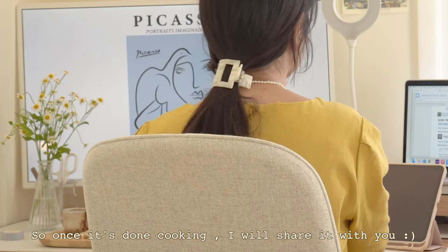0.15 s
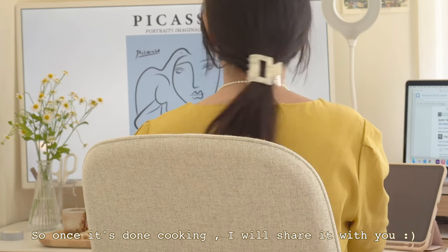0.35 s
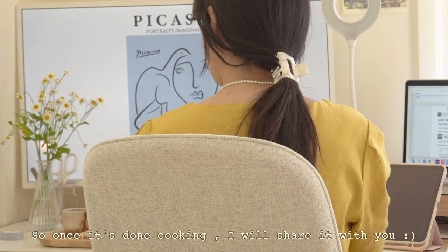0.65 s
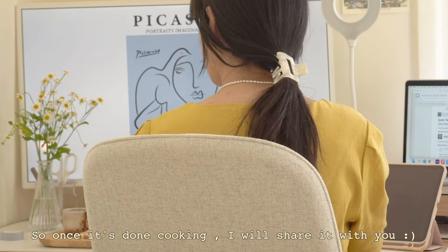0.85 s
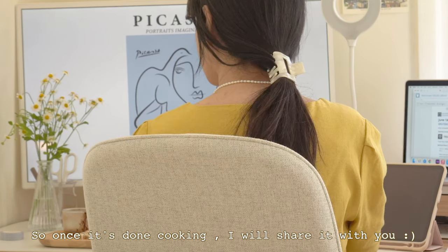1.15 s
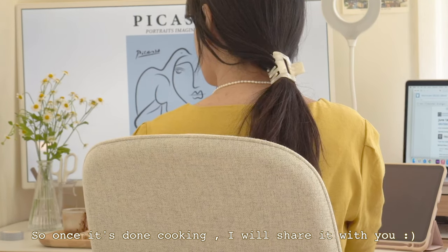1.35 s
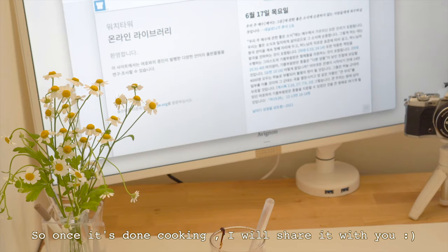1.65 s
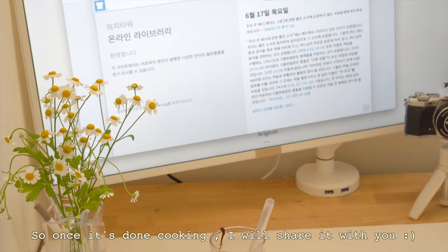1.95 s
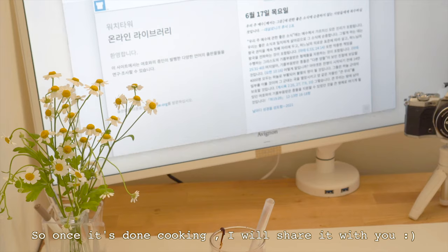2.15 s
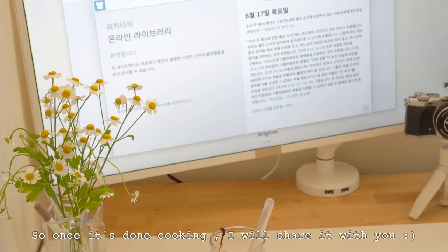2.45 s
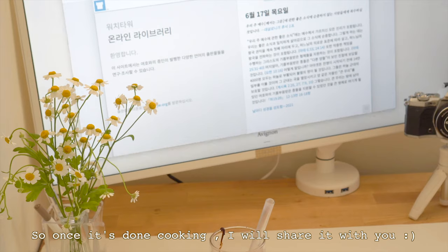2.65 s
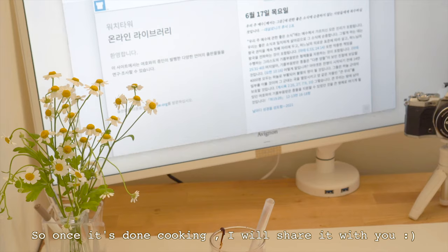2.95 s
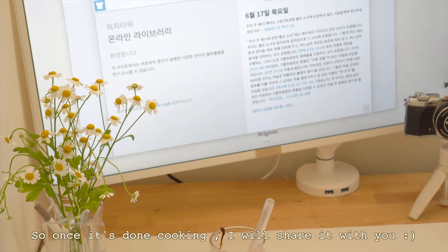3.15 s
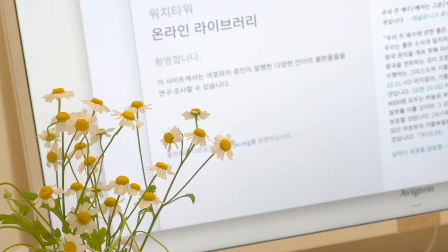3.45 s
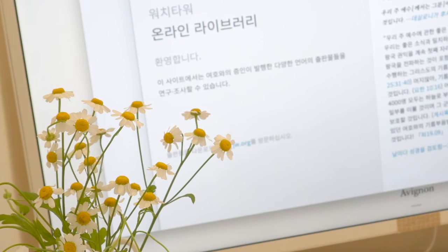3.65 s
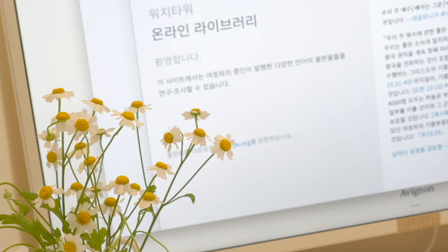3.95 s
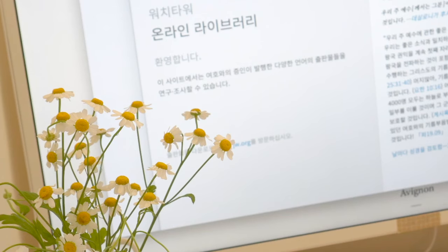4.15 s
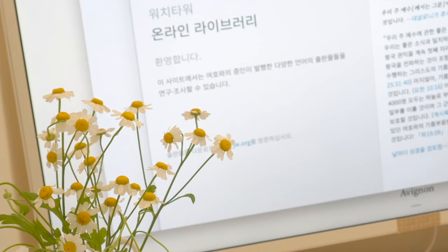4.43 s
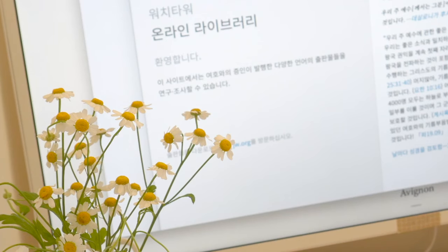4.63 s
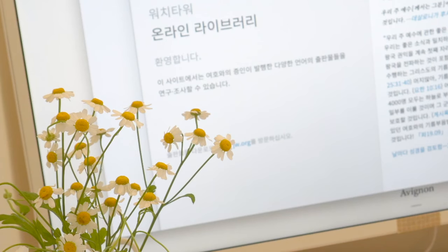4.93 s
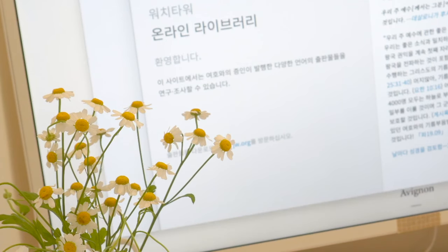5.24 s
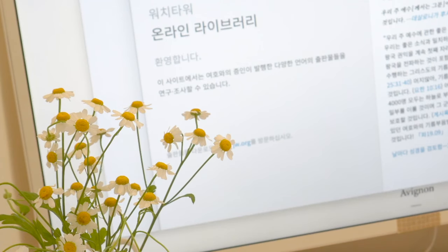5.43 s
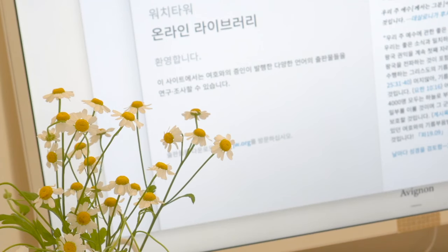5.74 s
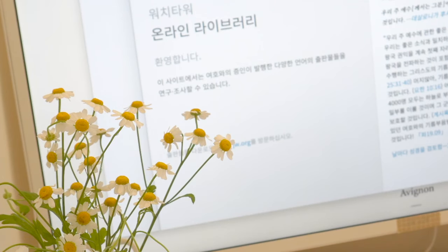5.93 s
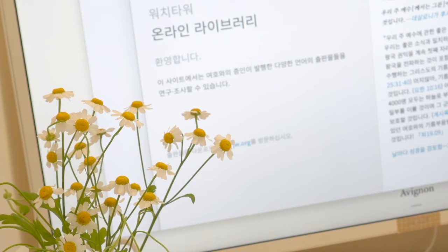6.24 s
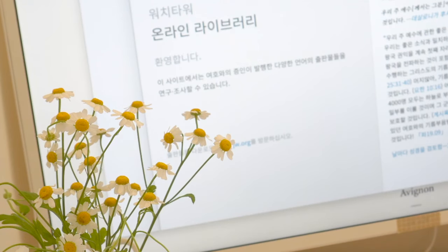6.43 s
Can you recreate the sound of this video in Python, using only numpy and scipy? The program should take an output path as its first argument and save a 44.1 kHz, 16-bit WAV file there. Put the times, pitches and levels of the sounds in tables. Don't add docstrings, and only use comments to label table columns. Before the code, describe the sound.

In a small quiet room, a glass straw swirls through an iced drink, clinking high and bright on the glass while ice chinks and liquid hums softly. The sound cuts abruptly to a quieter desk: crisp mouse clicks, each down and up, a hand tap, a dull thump that rings the desk top, and small late ticks. Stereo microphone a little way off, with faint hum.

```python
import sys
import numpy as np
from scipy import signal
from scipy.fft import rfft
from scipy.io import wavfile
from scipy.ndimage import uniform_filter1d

SR = 44100
rng = np.random.default_rng(int(sys.argv[2]) if len(sys.argv) > 2 else 0)


def volts_from_db(level):
    exponent = np.asarray(level, float) / 20
    return 10 ** exponent


def unload_audio(sound):
    columns = np.transpose(np.atleast_2d(sound))
    steps = np.round(np.clip(columns, -1, 1) * 32767)
    wavfile.write(sys.argv[1], SR, steps.astype(np.int16))


N = 290619


def evened(x):
    return x / np.sqrt(np.mean(x ** 2) + 1e-20)


def read(points, hz):
    f, value = np.transpose(points)
    return np.interp(np.log(hz + 1), np.log(f + 1), value)


def bumps(modes, hz):
    return sum(db * np.exp(-(2 * (hz - f) / width) ** 2) for f, width, db in modes)


def causal(db):
    log_gain = np.log(volts_from_db(np.maximum(db, -90)))
    full = np.concatenate([log_gain, log_gain[-2:0:-1]])
    return np.fft.ifft(np.exp(np.conj(signal.hilbert(full)))).real[:len(db) // 2]


def resonate(x, hz, width):
    b, a = signal.iirpeak(hz, hz / width, SR)
    return signal.lfilter(b, a, x)


def swells(events, rise_db_per_s, fall_db_per_s, rest_db):
    t, power = np.arange(N) / SR, volts_from_db(2 * rest_db)
    for s, hold, db in events:
        away_db = rise_db_per_s * np.maximum(s - t, 0) + fall_db_per_s * np.maximum(t - s - hold, 0)
        power = power + volts_from_db(2 * (db - away_db))
    return np.sqrt(power)


def likeness(side_db, hz):
    side = volts_from_db(2 * read(side_db, hz))
    return ((1 - side) / (1 + side))[:, None]


def hum(lines):
    return sum(volts_from_db(db) * evened(resonate(rng.standard_normal(N), f, width)) for f, width, db in lines)


# pitch_hz, side_minus_mid_db
NOISE_SIDE = [(60, -40), (130, -13), (290, -9), (640, -4), (1410, -0.5), (3100, -1), (6820, -1),
              (15000, -2.5)]


def hiss(colour, patchy_db):
    frames, hz = N // 512 + 5, np.fft.rfftfreq(2048, 1 / SR)
    a, b, c, d, patches = rng.standard_normal((frames, 1025, 5)).T
    patches = uniform_filter1d(patches, size=20, axis=0)
    patches = evened(uniform_filter1d(patches, size=8, axis=1))
    same, left = likeness(NOISE_SIDE, hz), a + 1j * b
    right = same * left + np.sqrt(1 - same ** 2) * (c + 1j * d)
    z = np.array([left, right]) * volts_from_db(read(colour, hz)[:, None] + patchy_db * patches)
    return evened(signal.istft(z, nperseg=2048, noverlap=1536)[1][:, :N])


# pitch_hz, time_to_fall_60_db_s
WALL_DECAY = [(200, 0.35), (600, 0.65), (1500, 0.54), (4000, 0.49), (6000, 0.44), (10000, 0.31),
              (15000, 0.47)]
# pitch_hz, side_minus_mid_db
ECHO_SIDE = [(60, -20.5), (130, -25.5), (290, -12), (640, -14), (1410, -9.5), (3100, -4.5), (6820, -0.5),
             (15000, -4)]


def room():
    taps = np.zeros((2, 30000))
    at = np.arange(120, 29980, 20) + rng.integers(0, 20, (2, 1493))
    np.put_along_axis(taps, at, rng.choice([-1., 1.], at.shape), 1)
    hz, t, z = signal.stft(taps, SR, nperseg=256)
    same = likeness(ECHO_SIDE, hz)
    z = np.array([z[0], same * z[0] + np.sqrt(1 - same ** 2) * z[1]])
    fade_db = -60 * t / read(WALL_DECAY, hz)[:, None]
    tail = signal.istft(z * volts_from_db(fade_db), SR, nperseg=256)[1]
    build_s = 0.014
    tail = tail * np.tanh(np.arange(tail.shape[1]) / SR / build_s)
    return tail / np.linalg.norm(tail[0])


# delay_ms, level_db
NEAR_ECHOES = [(4.1, 0.5), (9.3, -21), (13.5, -10), (20.5, -9.5), (31.0, -10)]


def struck_paths(contact_ms, wet_db, rebound_ms, rebound_db):
    paths = volts_from_db(wet_db) * room()
    paths[:, 0] = 1
    for (ms, echo_db), apart in zip(NEAR_ECHOES, rng.integers(0, 12, (len(NEAR_ECHOES), 2))):
        paths[[0, 1], round(ms * SR / 1000) + apart] += volts_from_db(echo_db)
    t = np.arange(800) / SR
    chatter = rng.standard_normal(len(t)) * np.exp(-(t * 1000 / contact_ms) ** 3) * np.tanh(t / 0.001)
    rebound = np.roll(chatter[::-1], round((contact_ms + rebound_ms) * SR / 1000))
    chatter = chatter + volts_from_db(rebound_db) * rebound
    return signal.fftconvolve(paths, chatter[None], axes=1)


STRAW_REST_HZ, SPOT_HOLD_S = 5650, 0.15


def blows(events, colour, pivot_hz, contact_ms, wet_db, gaps=(), lead_ms=0, lead_db=-90,
          pitch=((0, STRAW_REST_HZ),), spots=(), size=19, rebound_ms=0, rebound_db=-90, damp_db_per_s=0):
    hz, out = np.fft.rfftfreq(4096, 1 / SR), np.zeros((2, N + SR))
    lead = round(lead_ms * SR / 1000)
    body_db = read(colour, hz) + bumps(gaps, hz)
    for s, db, tilt_db, pan_db in events:
        paths = struck_paths(contact_ms, wet_db, rebound_ms, rebound_db)
        sunk_hz = STRAW_REST_HZ - np.interp(s, *np.transpose(pitch))
        colour_db = np.interp(hz + sunk_hz, hz, body_db) + tilt_db * np.log2((hz + 50) / pivot_hz)
        here = [mode for at, *mode in spots if 0 <= s - at < SPOT_HOLD_S]
        colour_db = colour_db + bumps(here, hz)
        chance = uniform_filter1d(abs(rfft(paths[:, :4096].mean(0))) ** 2, size=size)
        uneven_db = 10 * np.log10(chance / np.median(chance))
        touch = volts_from_db(lead_db) * causal(np.minimum(colour_db, -14.) - uneven_db)
        ring = np.pad(causal(colour_db - uneven_db), (lead, 0)) + np.pad(touch, (0, lead))
        sound = signal.fftconvolve(ring[None], paths, axes=1)
        sound *= volts_from_db(-damp_db_per_s * np.arange(sound.shape[1]) / SR)
        sound *= volts_from_db(db - 10.0) / np.sqrt(np.mean(sound[:, :2000] ** 2))
        start = max(round(s * SR) - lead, 0)
        out[:, start:start + sound.shape[1]] += sound * volts_from_db([[pan_db / 2], [-pan_db / 2]])
    return out[:, :N]


# full_effort_s, hold_s, level_db
STIR_STROKES = [
    (0.0, 0.0, -28),
    (0.25, 0.28, -40),
    (0.91, 0, -27.5),
    (1.36, 0.032, -38.5),
]
# pitch_hz, width_hz, level_db
DRINK_MODES = [(1148, 50, -10.5), (1464, 63, 11), (2810, 48.2, 5.5), (3034, 140, 16), (3732, 64, -6),
               (3582, 25.8, -16.5), (4275, 49, 5), (4800, 20, -32)]
# pitch_hz, level_db (per Hz)
SCRAPE_COLOUR = [(530, -17.5), (900, -36.5), (1150, -1), (1870, -1.5), (2920, -5), (3830, -4), (5850, 1.5),
                 (7150, -17), (8940, -9), (13200, -38), (15000, -23)]


def stirring():
    slips = volts_from_db(3.5 * np.minimum(rng.exponential(1, N), 4)) * (rng.random(N) < 1500 / SR)
    slips = slips * rng.choice([-1., 1.], N) + 0.31 * rng.standard_normal(N)
    rings = sum(volts_from_db(db) * evened(resonate(slips, f, 2.6 * width)) for f, width, db in DRINK_MODES)
    rasp = signal.oaconvolve(slips, causal(read(SCRAPE_COLOUR, np.fft.rfftfreq(2048, 1 / SR))))[:N]
    effort = swells(STIR_STROKES, rise_db_per_s=345.5, fall_db_per_s=189.5, rest_db=-52.5)
    dry = effort * evened(volts_from_db(6.0) * evened(rings) + evened(rasp))
    return volts_from_db(-7.5) * dry + volts_from_db(-6.0) * signal.fftconvolve(dry[None], room(), axes=1)[:, :N]


# crest_s, hold_s, level_db
LIQUID_WAVES = [(0.0, 0.0, -31.5), (0.224, 0.0, -39.5), (0.336, 0.019, -40.5), (0.464, 0.036, -49),
                (0.734, 0.0, -47.5), (0.9, 0.041, -42.5), (1.298, 0.0, -53), (1.444, 0.0, -38)]


def slosh():
    left, apart = rng.standard_normal((2, N))
    air = np.array([left, left + 0.52 * apart])
    for _ in range(2):
        air = resonate(air, 1165, 110)
    swirl = swells(LIQUID_WAVES, rise_db_per_s=225.5, fall_db_per_s=190.5, rest_db=-60)
    return volts_from_db(-5.0) * swirl * evened(air)


# time_s, level_db
RUMBLE_SWELL = [(0, -2), (.25, -3), (.5, -0.5), (.9, 1.5), (1.2, 1.5), (1.49, -2)]


def rumble_gain():
    s, db = np.transpose(RUMBLE_SWELL)
    return volts_from_db(np.interp(np.arange(N) / SR, s, db))


# pitch_hz, level_db (per Hz)
DRINK_AIR = [(15, -35), (30, -16.5), (76, 1), (206, -9), (354, -9.5), (545, -8.5), (988, -24.5),
             (1160, -18), (4250, -32.5), (4870, -35), (5730, -20), (6560, -37.5), (16000, -40.5)]


def drink_air():
    air = volts_from_db(-45) * hiss(DRINK_AIR, 0.89)
    low = signal.sosfiltfilt(signal.butter(2, 600, fs=SR, output="sos"), air)
    return air + (rumble_gain() - 1) * low


# pitch_hz, width_hz, level_db
MOTOR_LINES = [(59.6, 2.8, -53.5), (75.8, 6.8, -61), (153, 8.7, -62.5), (204, 10, -55)]


def motor():
    return rumble_gain() * hum(MOTOR_LINES)


# start_s, level_db, brightness_db (per octave), left_minus_right_db
STRAW_CLINKS = [(0.0522, -7.5, 3, 2.5), (0.079, -15, -0.5, -6.5), (0.098, -20, 5, 9),
                (0.1115, -17, -0.5, 1), (0.1478, -22.5, -1, -1), (0.3598, -9.5, 1.6, 1.5),
                (0.5685, -11.5, 1.1, 1.5), (0.996, -13, 0.5, 0.5), (1.349, -23.5, -3.5, 1),
                (1.405, -23, -1.5, 1), (1.459, -32, -5.5, -1)]
# pitch_hz, level_db (per Hz)
GLASS_COLOUR = [(1200, -36), (2100, -20.5), (2750, -20.5), (4300, -11.5), (4800, -19), (5350, -9),
                (5620, 7), (5850, -6), (6400, -13.5), (7600, -16.5), (8200, -13.5), (10200, -19.5),
                (13500, -27.5), (16000, -39.5)]
# pitch_hz, width_hz, level_db
GLASS_MODES = [(2800, 86, 7), (4270, 63, 3), (5057, 300, -25), (5590, 18, 1), (5630, 25, 3), (6000, 40, 0),
               (6080, 44, -0.5), (6750, 500, -26), (11040, 950, -16.5), (12550, 400, -13.5),
               (14600, 430, -11)]
# time_s, pitch_hz
STRAW_DEPTH = [(0.0, 5640), (0.2, 5670), (0.36, 5740), (0.57, 5690), (1.0, 5564), (1.35, 5590),
               (1.49, 5500)]
# start_s, pitch_hz, width_hz, level_db
STRAW_SPOTS = [(0.05, 5560, 60, 8), (0.05, 5640, 70, -1), (0.05, 5910, 200, 7), (0.05, 6450, 200, 7),
               (0.355, 5700, 80, -4), (0.355, 5860, 120, 4), (0.355, 5300, 150, 9), (0.565, 5615, 50, 4),
               (0.565, 5660, 50, -8), (0.565, 5800, 50, 6), (0.565, 5530, 150, 1), (0.99, 5490, 70, 4),
               (0.99, 5520, 60, -8.5), (0.99, 5760, 90, 4)]


def clinks():
    return blows(STRAW_CLINKS, GLASS_COLOUR, 5600, contact_ms=4.4, wet_db=3.0, gaps=GLASS_MODES,
                 lead_ms=4.3, lead_db=-8.5, pitch=STRAW_DEPTH, spots=STRAW_SPOTS, size=13)


# start_s, level_db, brightness_db (per octave), left_minus_right_db
ICE_HITS = [
    (0.4641, -30, 0.0, -0.28),
    (1.2765, -38.5, 0.0072, -1.5),
]
ICE_CHINKS = [(1.409, -34, -2, 0.0), (1.438, -33.5, -2.5, 0.0), (1.459, -34, 2, 0.0),
              (0.834, -50, 0.0, 0.0), (0.906, -40, 7, 0.0), (0.951, -40, 5, 0.0), (1.21, -43, 7, 0.0)]
ICE_GRAZES = [
    (0.8622, -28.5, 0.0, 0.45),
    (0.9113, -24, 0.0063, -0.58),
]
ICE_KNOCKS = [
    (1.1549, -27, 0.0, -0.91),
    (1.2114, -37.5, 0.015, 0.0),
]
# pitch_hz, level_db (per Hz)
CUBE_COLOUR = [(470, -70), (800, -34), (1020, -18), (1090, -17), (1150, 2.5), (1300, -29), (2000, -15.5),
               (2600, -53), (4400, -120)]
# pitch_hz, level_db (per Hz)
KNOCK_COLOUR = [(530, -49), (900, -15), (1150, -12), (1420, 0), (1760, 1.5), (2050, -7.5), (2830, -8.5),
                (3650, -33), (4500, -12), (5850, -36), (9900, -120)]
# pitch_hz, width_hz, level_db
CUBE_MODES = [(2800, 180, 16), (3210, 230, 23.5), (1710, 400, 9)]
# pitch_hz, width_hz, level_db
GRAZE_MODES = [(1400, 170, 4), (2814, 61, 20.5), (4200, 250, 13), (3540, 370, -6), (5130, 270, -11)]


def ice():
    hits = blows(ICE_HITS, CUBE_COLOUR, 1200, contact_ms=6.5, wet_db=0.5)
    chinks = blows(ICE_CHINKS, SCRAPE_COLOUR, 3000, contact_ms=3.6, wet_db=-4.0, gaps=CUBE_MODES)
    grazes = blows(ICE_GRAZES, SCRAPE_COLOUR, 4000, contact_ms=8.4, wet_db=5.0, gaps=GRAZE_MODES)
    knocks = blows(ICE_KNOCKS, KNOCK_COLOUR, 1800, contact_ms=4.1, wet_db=2.5)
    return hits + chinks + grazes + knocks


# pitch_hz, level_db (per Hz)
DESK_AIR = [(15, -21), (25, -33), (59, 1.5), (92, -13), (123, 4), (157, -10.5), (270, -4), (405, -9),
            (659, -11), (796, -15), (1400, -17), (1610, -22), (2550, -21.5), (3160, -28.5), (16000, -35.5)]
# pitch_hz, width_hz, level_db
MAINS_LINES = [(60.3, 2.5, -77), (115.4, 5.5, -67), (239.8, 9.7, -63.5), (357.5, 2.1, -67.5)]


def desk_air():
    return volts_from_db(-52) * hiss(DESK_AIR, 1.57) + hum(MAINS_LINES)


# full_contact_s, hold_s, level_db
SLEEVE_BRUSHES = [
    (1.49, 0.047, -57),
    (3.52, 0.0, -59.5),
    (4.37, 0.0, -60),
    (5.85, 0.014, -59.5),
    (6.45, 0.12, -64.5),
]
# pitch_hz, level_db (per Hz)
CLOTH_COLOUR = [(800, -25), (1500, 0), (3000, 1), (5200, -4), (10000, -7.5), (16000, -15)]


def sleeve():
    contact = swells(SLEEVE_BRUSHES, rise_db_per_s=82, fall_db_per_s=84, rest_db=-69.5)
    return contact * hiss(CLOTH_COLOUR, 4.5)


# start_s, level_db, brightness_db (per octave), left_minus_right_db
BUTTON_PRESSES = [
    (2.0622, -35.5, 0.00053, 1.5),
    (3.1233, -38.5, 0.016, 2.0),
    (4.9473, -37.5, 0.0052, 1.1),
]
SHELL_STOPS = [
    (2.0672, -32.5, 0.02, -0.5),
    (3.1295, -33.5, 0.0048, 0.0),
    (4.807, -46, 0.0026, 0.058),
    (4.954, -44.5, 0.0094, -0.46),
]
BUTTON_RELEASES = [
    (2.1898, -30, 0.0044, 1.0),
    (3.2066, -31, 0.0061, 1.0),
    (5.049, -31.5, 0.0, 1.3),
]
FINAL_CLICK = [
    (6.3022, -33, 0.0038, 0.78),
]
# pitch_hz, level_db (per Hz)
PRESS_COLOUR = [(1500, -73), (2500, -6), (4000, -3.5), (6500, -8.5), (9000, -8.5), (12000, -7), (15000, -6),
                (16000, -10)]
SHELL_COLOUR = [(88, -57), (150, -27), (253, 12), (469, 1), (780, 5.5), (1040, -8.5), (1330, 7),
                (1960, 1.5), (2920, -12), (4000, -24), (5200, -43), (8800, -120)]
RELEASE_COLOUR = [(1500, -21.5), (2900, -29), (3600, -17.5), (5300, -17), (8000, -22.5), (10800, -19),
                  (12200, -25), (14500, -24), (16000, -39)]
FINAL_COLOUR = [(240, -33), (400, -18), (616, 3.5), (719, -10), (979, -6), (1630, -16), (1760, -16),
                (3640, -22), (5270, -3), (7400, -15), (16000, -19)]
# pitch_hz, width_hz, level_db
BUTTON_MODES = [(4460, 310, 5), (4880, 700, 11), (5860, 390, 5.5), (6630, 300, 6.5), (7480, 300, 7.5),
                (8700, 400, 7.5), (10020, 870, 8.5), (11300, 350, 0), (13600, 500, 0)]
# start_s, pitch_hz, width_hz, level_db
BUTTON_BENDS = [(2.05, 10700, 504, -6), (2.05, 15300, 900, 2), (2.05, 4800, 600, -2.5),
                (2.18, 11500, 1200, -4.5), (2.18, 15300, 1500, -6), (3.11, 7060, 500, 1),
                (3.11, 15300, 900, 4.5), (3.11, 4900, 500, 2), (3.2, 7540, 503, 6.5), (4.93, 5400, 700, 4),
                (4.93, 4460, 300, -2), (4.93, 10450, 600, 4), (4.93, 15200, 900, 6)]


def mouse():
    press_modes = [(f, width, 0.93 * db) for f, width, db in BUTTON_MODES]
    presses = blows(BUTTON_PRESSES, PRESS_COLOUR, 7000, contact_ms=4.9, wet_db=2.0,
                    spots=BUTTON_BENDS, gaps=press_modes)
    stops = blows(SHELL_STOPS, SHELL_COLOUR, 1200, contact_ms=4.3, wet_db=3.5)
    releases = blows(BUTTON_RELEASES, RELEASE_COLOUR, 6000, contact_ms=6.3, wet_db=1.5,
                     damp_db_per_s=10, gaps=BUTTON_MODES, spots=BUTTON_BENDS)
    final = blows(FINAL_CLICK, FINAL_COLOUR, 5000, contact_ms=6.7, wet_db=4.5,
                  gaps=[(5460, 830, 3.)], damp_db_per_s=34)
    return presses + stops + releases + final


# start_s, level_db, brightness_db (per octave), left_minus_right_db
PEN_NUDGES = [
    (3.7925, -41, -0.2, .3),
    (3.842, -55, -1.7, .3),
]
DESK_TAPS = [
    (3.884, -29, 0.005, -0.5),
]
PALM_THUMP = [
    (4.588, -24, 0.0038, 0.0),
]
FINGER_LANDING = [
    (4.606, -30, -2.7, 0.0),
]
SMALL_TICKS = [
    (5.697, -57, 4.5, -0.6),
    (6.0785, -37, 1, 0.47),
    (6.164, -42.5, 0.48, .6),
    (6.404, -50, 2.1, .6),
]
# pitch_hz, level_db (per Hz)
PEN_COLOUR = [(250, 7.5), (800, -29), (1400, 5), (2000, -6), (2600, -1), (3400, -6), (4500, -6.5),
              (6000, -18), (9000, -30), (16000, -26)]
DESK_COLOUR = [(59, -42), (100, -13), (250, 4.5), (510, -12), (798, -11), (959, -22.5), (1400, -3),
               (1620, -18), (1960, -17.5), (2820, -24.5), (5090, -28), (13000, -47)]
PALM_COLOUR = [(47, -47.5), (80, -17), (180, -11.5), (250, -12), (380, -10.5), (500, -11), (592, -6.5),
               (1050, -25), (1390, -19), (2520, -24.5), (3190, -30), (4780, -28), (13000, -47.5)]
TICK_COLOUR = [(240, -38), (400, -5), (481, -22), (528, 5.5), (949, 5), (1180, 2.5), (1350, -1.5),
               (1700, 5.5), (2300, -8.5), (3580, -9), (6340, -1), (14800, -13.5), (16000, -32)]


def hand():
    nudges = blows(PEN_NUDGES, PEN_COLOUR, 2600, contact_ms=2.5, wet_db=0.5, rebound_ms=6.0, rebound_db=9.0)
    taps = blows(DESK_TAPS, DESK_COLOUR, 600, contact_ms=5.4, wet_db=6.0, damp_db_per_s=34)
    thump = blows(PALM_THUMP, PALM_COLOUR, 600, contact_ms=6.7, wet_db=4.5)
    fingers = blows(FINGER_LANDING, PALM_COLOUR, 400, contact_ms=16.0, wet_db=1.0)
    ticks = blows(SMALL_TICKS, TICK_COLOUR, 3000, contact_ms=6.5, wet_db=3.0)
    return nudges + taps + thump + fingers + ticks


# pitch_hz, level_db, time_to_fall_60_db_s
BOARD_MODES = [(231.7, 0.5, 0.29), (285, -8.5, .4), (339, -7, .3), (409, -10.5, 0.23), (581, -8.5, 0.21),
               (643, -7, .12), (720, -7, 0.082)]
# start_s, level_db
BOARD_BLOWS = [
    (4.59, -26),
    (3.886, -39),
    (4.3, -50.5),
]


def board():
    t, out = np.arange(SR // 2) / SR, np.zeros(N + SR)
    ring = np.zeros(len(t))
    for hz, db, t60 in BOARD_MODES:
        ring += volts_from_db(db - 60 * t / t60) * np.sin(2 * np.pi * (hz * t + rng.random()))
    ring *= np.tanh(t / 0.009)
    for s, db in BOARD_BLOWS:
        start = round(s * SR)
        out[start:start + len(t)] += volts_from_db(db) * ring
    return out[:N]


def scene():
    change_s, blend_s = 1.488, 0.0014
    second = np.clip((np.arange(N) / SR - change_s) / blend_s, 0, 1)
    drink = stirring() + slosh() + drink_air() + motor() + clinks() + ice()
    desk = desk_air() + sleeve() + mouse() + hand() + board()
    return (1 - second) * drink + second * desk


def roll_off(x):
    return signal.sosfilt(signal.butter(12, 16630, fs=SR, output="sos"), x)


def record(dry):
    hz, _, z = signal.stft(dry, SR, nperseg=1024)
    power = uniform_filter1d((abs(z) ** 2).mean(0), size=5, axis=0)
    band_db = 10 * np.log10(uniform_filter1d(power, size=3, axis=1) + 1e-20)
    loudest_db = band_db[hz > 3000].max(0)
    steady = loudest_db - np.roll(loudest_db, 2) < 8
    depth_db = np.interp(hz, [7000, 9000, 14300, 14400], [32, 39, 41, 27])[:, None]
    masked = (band_db < loudest_db - depth_db) & (hz[:, None] > 4800) & steady
    top_gain = np.where(hz > 15850, volts_from_db(-31.0), 1) * (hz < 16550)
    z = z * np.where(masked, .02, 1) * top_gain[:, None]
    mix = signal.istft(z, SR, nperseg=1024)[1][:, :N]
    return roll_off(mix)


dry = scene()
out = record(dry)
unload_audio(out)
```